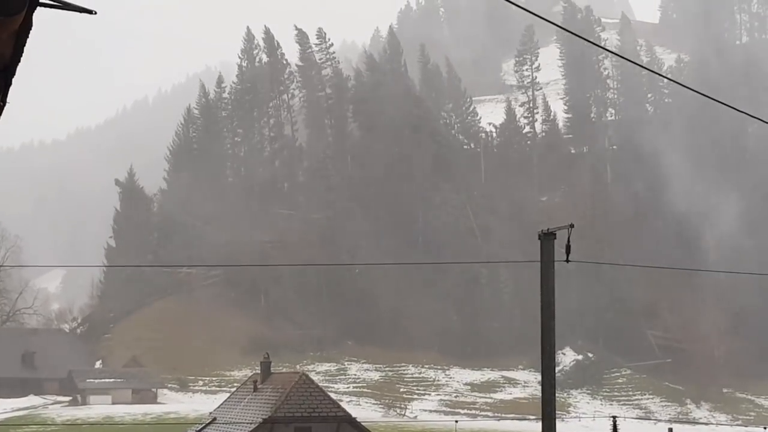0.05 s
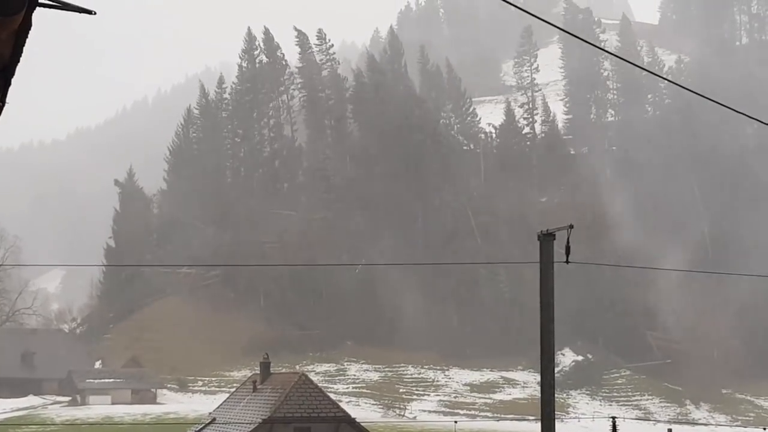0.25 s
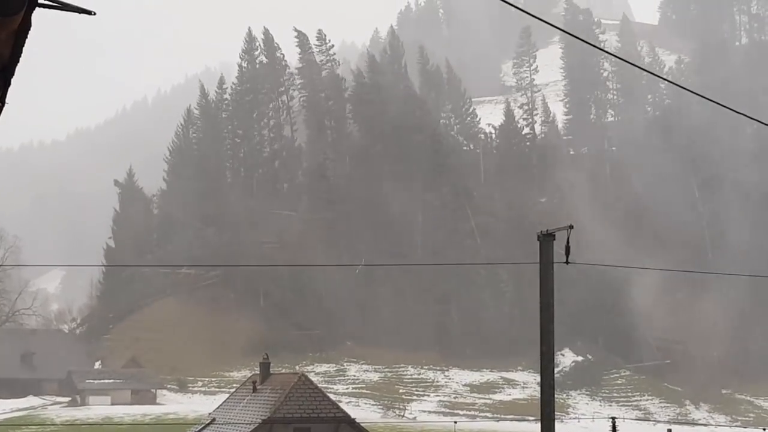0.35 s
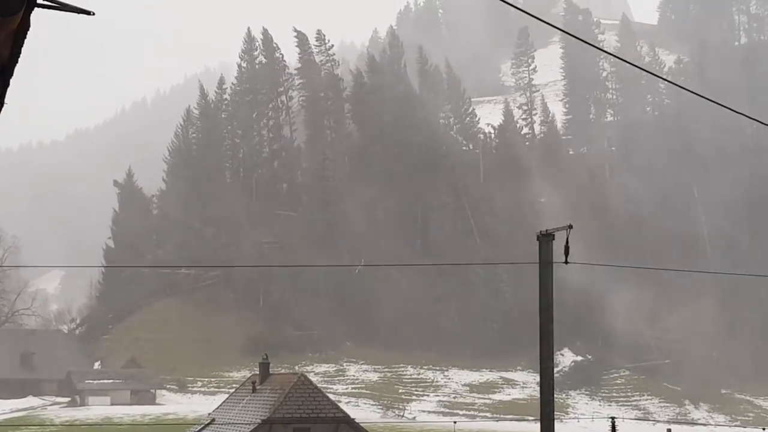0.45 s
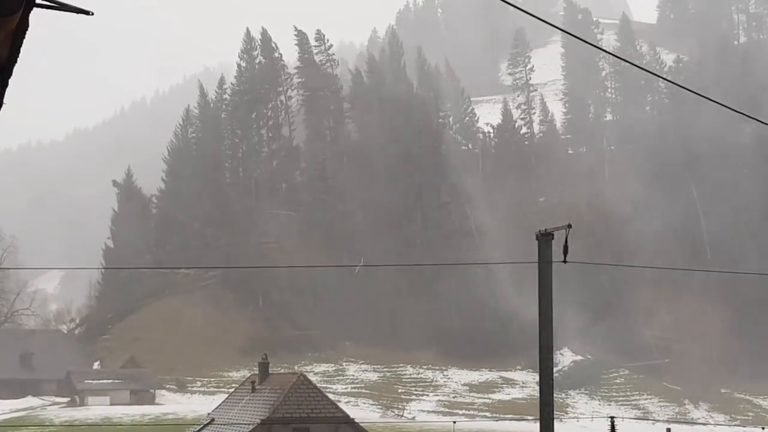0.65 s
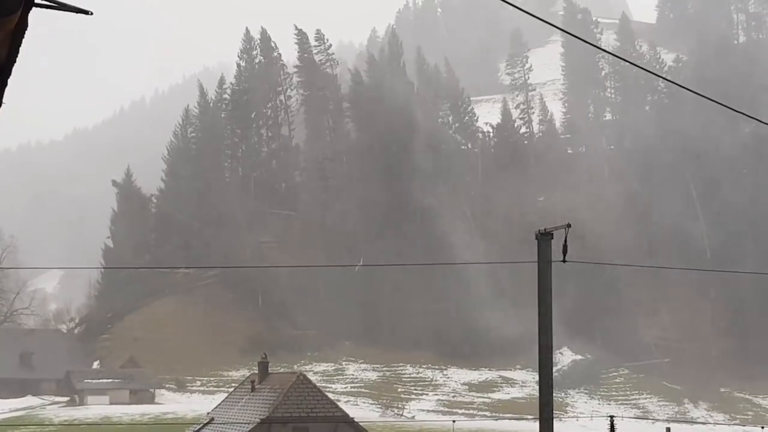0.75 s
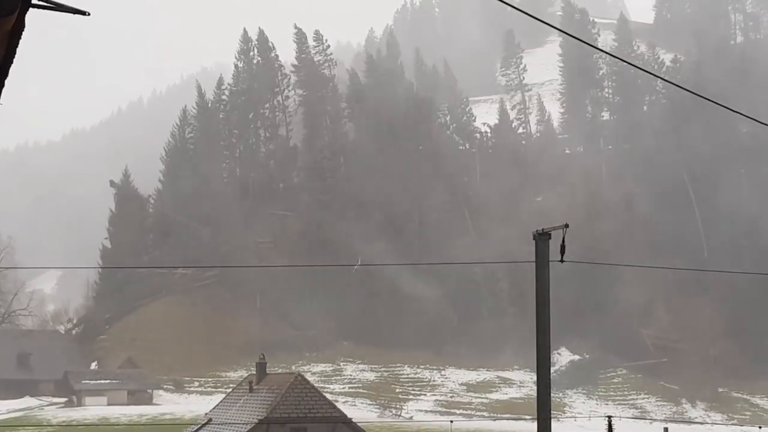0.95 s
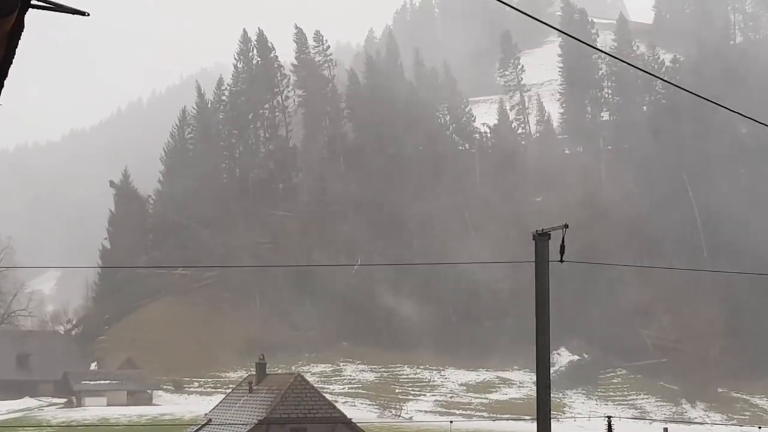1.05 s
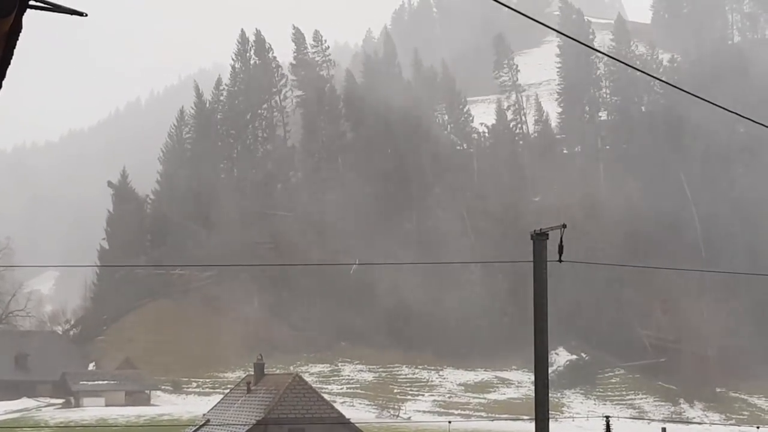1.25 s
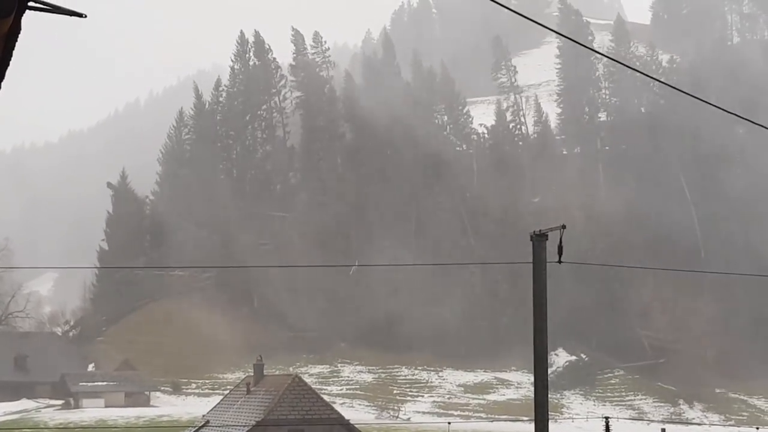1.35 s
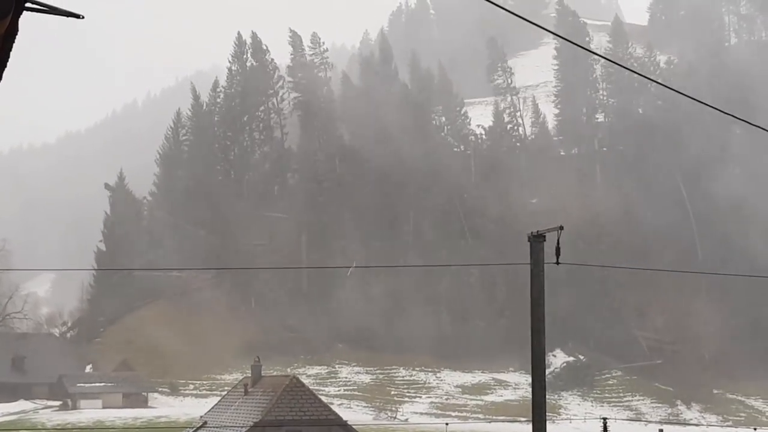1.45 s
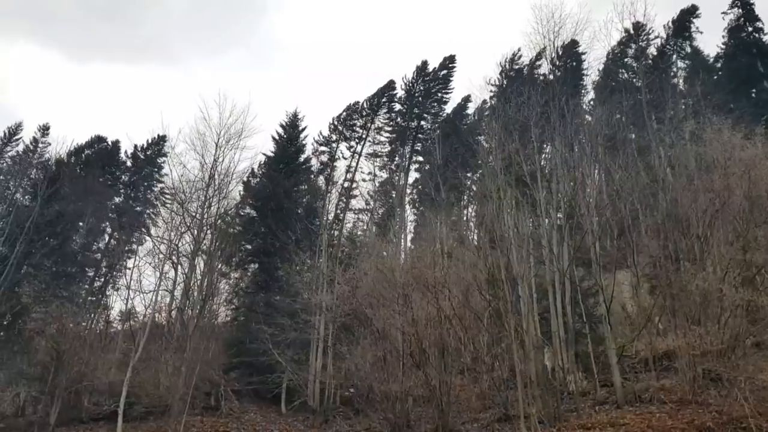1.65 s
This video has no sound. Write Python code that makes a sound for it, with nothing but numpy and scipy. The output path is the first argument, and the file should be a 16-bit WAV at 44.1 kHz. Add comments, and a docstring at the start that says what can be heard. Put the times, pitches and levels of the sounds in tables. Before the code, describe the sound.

Strong wind hits the microphone outdoors with uneven rumbling and thumps, building to a harsh, fluttering gust before easing. Underneath are a steady rush of wind in far trees and a few faint ticks of fine drops.

```python
"""Storm wind buffeting the left microphone port, on a wooded hillside. Eddies pass as suction pulses,
finer and harsher at the height of the gust, and a few catch the right port too. The strongest gusts
throb and rip. Fine spray ticks close to the microphone while the forest roars in the distance.
The wind drops, then a brighter rush sets in abruptly."""
import sys
import numpy as np
from scipy import signal
from scipy.io import wavfile
from scipy.ndimage import uniform_filter1d

SR = 44100
rng = np.random.default_rng(int(sys.argv[2]) if len(sys.argv) > 2 else 0)


def transcribe(u):
    """Save the signal u as a 16-bit wav file named by the first command-line argument.

    u: samples, shape (n,) or (channels, n), limited to [-1, 1]; the rate is SR.
    q: integer samples, one column per channel.
    """
    v = np.clip(np.atleast_2d(u).T, -1, 1)
    q = np.round(v * 32767).astype(np.int16)
    wavfile.write(sys.argv[1], SR, q)


N = 74970
TIME_S = np.arange(N) / SR


def from_db(db):
    """Decibels to gain."""
    return 10 ** (np.asarray(db) / 20)


def rms_one(x):
    """Scale to rms 1."""
    return x / np.sqrt(np.mean(x ** 2) + 1e-20)


def level_curve(rows):
    """Gain over time from rows of time_s, level_db."""
    time_s, level_db = np.transpose(rows)
    return from_db(np.interp(TIME_S, time_s, level_db))


def gate(start_s, length_s, edge_s=0.0044):
    """Fade in, hold, fade out."""
    return np.clip(np.minimum(TIME_S - start_s, start_s + length_s - TIME_S) / edge_s + .5, 0, 1)


def bursts(rows):
    """Gain over time from rows of start_s, length_s, level_db."""
    return sum(from_db(level_db) * gate(start_s, length_s) for start_s, length_s, level_db in rows)


def at_hz(rows, hz):
    """Read a table on a log-frequency axis."""
    freq_hz, value = np.transpose(rows)
    return np.interp(np.log(hz), np.log(freq_hz), value)


def butter(x, hz, kind):
    """Causal Butterworth filter."""
    sos = signal.butter(2, np.clip(hz, 10, .45 * SR), kind, fs=SR, output="sos")
    return signal.sosfilt(sos, x + 1e-18)


def drift(rate_hz):
    """Slow random wander of spread 1."""
    hop, settle = 40, 2000
    pole = np.exp(-2 * np.pi * rate_hz * hop / SR)
    white = rng.standard_normal(N // hop + settle + 2)
    slow = signal.lfilter([1], [1, -2 * pole, pole * pole], white)[settle:]
    return np.interp(np.arange(N) / hop, np.arange(len(slow)), rms_one(slow))


def airy_noise(spectrum, correlation, flicker_db, flicker_hz):
    """Third-octave bands of stereo noise, each with its own level, flicker and width; rms 1."""
    edges_hz = 25 * 2 ** (np.arange(29) / 3)
    shared_flicker = drift(flicker_hz)
    white = rng.standard_normal((2, 2, N))
    out = 0
    for k, (low, high) in enumerate(zip(edges_hz, edges_hz[1:])):
        mid, side = butter(white[k % 2], [low, high], "band")
        centre_hz = np.sqrt(low * high)
        alike = at_hz(correlation, centre_hz)
        flicker = .5 * shared_flicker + drift(flicker_hz)
        gain = from_db(at_hz(spectrum, centre_hz) + flicker_db * flicker)
        out += gain * (np.sqrt(1 + alike) * mid + np.sqrt(1 - alike) * side * [[1], [-1]])
    return rms_one(out)


def suction(time_s, width_s):
    """The bell-shaped pressure dip of one eddy: (samples it covers, pressure)."""
    span_s = np.array([time_s - 20 * width_s, time_s + 20 * width_s])
    first, last = np.clip(span_s * SR, 0, N).astype(int)
    offset = (TIME_S[first:last] - time_s) / width_s
    taper = np.cos(np.pi * offset / 40) ** 2
    return slice(first, last), -taper / (1 + offset ** 2)


def lone_eddies(rows, band_hz):
    """One band-limited dip for each row of time_s, depth_db, half_width_s."""
    pressure = np.zeros(N)
    for time_s, depth_db, width_s in rows:
        near, dip = suction(time_s, width_s)
        pressure[near] += from_db(depth_db) * dip
    return butter(butter(pressure, band_hz[0], "high"), band_hz[1], "low")


def eddies(speed, per_s, width_s, width_spread, spread_db, band_hz, even_s, regularity=4):
    """Suction pulses of varied width and depth, carried past at a relative speed; evened to rms 1."""
    count = 1500
    pressure, speed = np.zeros(N), speed * np.ones(N)
    gaps = rng.gamma(regularity, 1 / regularity, count)
    arrivals = np.searchsorted(np.cumsum(speed) * per_s / SR, np.cumsum(gaps))
    for i, (wide, deep) in zip(arrivals, rng.standard_normal((count, 2))):
        if i < N:
            near, dip = suction(i / SR, width_s * np.exp(width_spread * wide) / speed[i])
            pressure[near] += from_db(spread_db * deep) * dip
    pressure = butter(butter(pressure - pressure.mean(), band_hz[0], "high"), band_hz[1], "low")
    window = int(even_s * SR) + 1
    power = uniform_filter1d(uniform_filter1d(pressure ** 2, window), window)
    return pressure / np.sqrt(np.abs(power) + 1e-9)


# Roar of the distant trees: time_s, relative_level_db
ROAR_LEVELS = [(0.03, -42.5), (0.56, -42), (0.786, -45.5), (0.846, -45.5), (1.05, -49), (1.202, -48.5),
               (1.228, -49.5), (1.558, -50.5), (1.59, -50.5)]
# Its tone at the microphone: freq_hz, relative_density_db
ROAR_SPECTRUM = [(30, 1.5), (90, -1.5), (250, 0.5), (420, -3.5), (650, -5), (1200, -9), (2200, -10),
                 (3900, -20.5), (6000, -34.5), (9000, -39.5), (13000, -41), (15500, -44)]
# Its stereo image: freq_hz, left_right_correlation
ROAR_CORRELATION = [(100, 1), (600, 0.77), (1250, 0.15), (2200, 0.55), (3500, 0.37), (7000, 0.4),
                    (13000, 0.38)]


def forest():
    """Wind in far conifers: a smooth roar, a little right of centre, slowly easing."""
    gain_db, pan_db = 12.5, 0.83
    roar = airy_noise(ROAR_SPECTRUM, ROAR_CORRELATION, flicker_db=0.41, flicker_hz=6)
    return from_db(gain_db) * level_curve(ROAR_LEVELS) * roar * from_db([[-pan_db], [pan_db]])


# Tone of the closing rush of air: freq_hz, relative_density_db
RUSH_SPECTRUM = [(40, -11), (110, -1.5), (230, 4.5), (450, -2.5), (900, -6.5), (2100, -4.5), (3200, -9.5),
                 (5700, -14), (8000, -29), (12500, -34.5), (15000, -44)]
# Its stereo image: freq_hz, left_right_correlation
RUSH_CORRELATION = [(300, 0.96), (700, 0.61), (1200, -0.22), (2000, 0.47), (3500, -0.063), (10000, 0.1)]


def rush():
    """A brighter, wider rush of air that starts at once and holds."""
    start_s, attack_s, level_db = 1.607, 0.0076, -28
    onset = np.clip((TIME_S - start_s) / attack_s, 0, 1)
    air = airy_noise(RUSH_SPECTRUM, RUSH_CORRELATION, flicker_db=0.64, flicker_hz=10.4)
    return from_db(level_db) * onset * air


# Flurries of spray close to the microphone: start_s, length_s, level_db
SPRAY_FLURRIES = [(0.085, 0.047, -62), (0.32, 0.11, -61), (0.458, 0.02, -57), (0.635, 0.048, -62),
                  (0.937, 0.03, -64), (1.03, 0.017, -65), (1.162, 0.033, -66.5)]


def spray():
    """Tiny drops tick at random on both sides, louder in each flurry."""
    drops_per_s, floor_db, crossfeed = 730, -75, 0.33
    sizes = from_db(2.7 * np.minimum(rng.exponential(1, (2, N)), 4))
    signs = rng.choice([-1, 1], (2, N))
    impacts = sizes * signs * (rng.random((2, N)) < drops_per_s / SR)
    ticks = rms_one(butter(impacts + crossfeed * impacts[::-1], [8500, 15000], "band"))
    return (from_db(floor_db) + bursts(SPRAY_FLURRIES)) * ticks


# Larger drops landing nearby: start_s, relative_peak_db, left_minus_right_db
NEAR_DROPS = [(0.327, -41, -2), (0.334, -46, 0), (0.375, -49, -2), (0.462, -49, -6), (0.469, -48, 2),
              (0.638, -40, -3), (0.941, -42, -7)]


def splashes():
    """Each larger drop bursts into a short, high fizz."""
    decay_s = 0.0019
    envelope = np.zeros((2, N))
    for start_s, peak_db, pan_db in NEAR_DROPS:
        decay = (TIME_S >= start_s) * np.exp(-np.abs(TIME_S - start_s) / decay_s)
        envelope += from_db([[peak_db + pan_db / 2], [peak_db - pan_db / 2]]) * decay
    return envelope * butter(rng.standard_normal((2, N)), [10500, 15000], "band")


# Mist around the microphone: time_s, relative_level_db
MIST_LEVELS = [(0.03, -65), (0.512, -59.5), (0.886, -64.5), (0.994, -65), (1.358, -69), (1.59, -71)]


def mist():
    """The finest spray merges into a continuous hiss."""
    gain_db, correlation = -3.5, 0.54
    centre = np.sqrt(correlation) * rng.standard_normal(N)
    sides = np.sqrt(1 - correlation) * rng.standard_normal((2, N))
    hiss = rms_one(butter(centre + sides, [8500, 14300], "band"))
    return from_db(gain_db) * level_curve(MIST_LEVELS) * hiss


# Puffs on the right port: start_s, length_s, level_db
PUFFS = [(0.642, 0.059, -23.5), (0.735, 0.034, -29), (0.845, 0.0082, -17), (0.962, 0.023, -29),
         (1.258, 0.0325, -22), (1.34, 0.11, -34)]


def puffs():
    """Brief runs of eddies catch the right port."""
    return bursts(PUFFS) * eddies(speed=0.99, per_s=160, width_s=0.00089, width_spread=0.3,
                                  spread_db=1, band_hz=(68, 600), even_s=0.016)


# Spells of tearing at the left port: start_s, length_s, level_db
TEAR_SPELLS = [(0.7, 0.092, -30.5), (1.097, 0.131, -25)]


def tearing():
    """The flow tears at the port: a dense rasp of tiny eddies."""
    return bursts(TEAR_SPELLS) * eddies(speed=1, per_s=520, width_s=0.00034, width_spread=0.22,
                                        spread_db=5, band_hz=(650, 1600), even_s=0.02)


# Sharp rips within the tearing: time_s, relative_depth_db
RIP_DIPS = [(1.0999, -4), (1.1091, -7.5), (1.125, -12), (1.136, -9), (1.147, -0.5), (1.1588, -1),
            (1.194, -3.5), (1.197, -4), (1.2127, -6.5), (1.22, -3.5)]


def rips():
    """The flow breaks away from the port's edge: very narrow dips that crackle."""
    width_s = 0.00018
    return lone_eddies([(time_s, db, width_s) for time_s, db in RIP_DIPS], band_hz=(440, 1860))


# Slaps on the left port: time_s, relative_depth_db, half_width_s
SLAP_DIPS = [(0.23, -16, 0.002), (0.29, -20, 0.0011), (0.306, -12, 0.002), (0.446, -11, 0.0016),
             (0.573, 3.5, 0.00091), (0.707, -1.5, 0.00046), (0.775, -2, 0.00031), (0.9, 2.5, 0.00035),
             (0.945, -3, 0.0011), (0.982, -2.5, 0.00047), (1.084, -4, 0.00064), (1.103, -1.5, 0.00033),
             (1.233, -2, 0.00045), (1.251, -10, 0.00052), (1.335, 0, 0.00061), (1.341, -5, 0.0017)]


def slaps():
    """Lone hard eddies, each one deep dip."""
    return lone_eddies(SLAP_DIPS, band_hz=(111, 1540))


# Spells of throbbing at the left port: start_s, length_s, level_db
THROB_SPELLS = [(0.44, 0.058, -21.5), (0.705, 0.037, -19), (0.737, 0.052, -12.5), (0.895, 0.042, -10),
                (1.396, 0.042, -21)]


def throbbing():
    """Eddies are shed almost evenly, so the buffeting throbs."""
    return bursts(THROB_SPELLS) * eddies(speed=1, per_s=170, width_s=0.0015, width_spread=0.11,
                                         spread_db=1, band_hz=(133, 258), even_s=0.018, regularity=15.2)


# Pressure of the small eddies on the left port: time_s, relative_level_db
FLUTTER_LEVELS = [(0.52, -67), (0.572, -21), (0.594, -49), (0.616, -34.5), (0.652, -30), (0.676, -52),
                  (0.698, -27), (0.776, -19), (0.794, -42), (0.81, -19.5), (0.83, -24), (0.846, -21),
                  (0.88, -37.5), (0.912, -24.5), (0.936, -27), (0.984, -20), (1.015, -26.5), (1.05, -37.5),
                  (1.11, -24), (1.2, -25), (1.248, -33.5), (1.29, -50)]


def flutter():
    """Small, quick eddies flutter while the gust is strong."""
    gain_db = 7.5
    envelope = level_curve(FLUTTER_LEVELS) * gate(start_s=0.46, length_s=0.76, edge_s=0.016)
    pulses = eddies(speed=0.99, per_s=300, width_s=0.00055, width_spread=0.21,
                    spread_db=2.5, band_hz=(214, 830), even_s=0.024)
    return from_db(gain_db) * envelope * pulses


# Pressure of the large eddies on the left port: time_s, relative_level_db
GUST_LEVELS = [(0.0, -38), (0.04, -40), (0.062, -28), (0.09, -39), (0.15, -35), (0.235, -25), (0.295, -21),
               (0.358, -23), (0.402, -41.5), (0.44, -25), (0.482, -23.5), (0.516, -39.5), (0.558, -17),
               (0.576, -16.5), (0.606, -29), (0.662, -20), (0.68, -38.5), (0.704, -15.5), (0.762, -16.5),
               (0.8, -21.5), (0.89, -18), (0.94, -13), (0.956, -17), (0.994, -15), (1.022, -18.5),
               (1.115, -14.5), (1.15, -21), (1.188, -16.5), (1.27, -27), (1.292, -32.5), (1.308, -25),
               (1.335, -27), (1.368, -33), (1.406, -23), (1.436, -26.5), (1.458, -50.5), (1.482, -33.5),
               (1.6, -45.5), (1.628, -38.5), (1.7, -45)]


def rumble():
    """Large eddies rumble; stronger air moves faster, so they are shorter and come more often."""
    gain_db, full_gust_db = 6, -15
    gust = level_curve(GUST_LEVELS)
    speed = (gust / from_db(full_gust_db)) ** 0.24
    pulses = eddies(speed, per_s=175, width_s=0.001, width_spread=0.19,
                    spread_db=4.5, band_hz=(71.7, 476), even_s=0.024)
    return from_db(gain_db) * gust * pulses


def buffeting():
    """Wind right on the microphone: the left port takes the gust, the right a leak and its own puffs."""
    leak_db, port_low_hz = -14, 41
    left = rumble() + flutter() + tearing() + throbbing() + rips() + slaps()
    right = from_db(leak_db) * left + puffs()
    return butter(np.array([left, right]), port_low_hz, "high")


def scene():
    """Buffeting on the microphone and spray nearby, over the far roar and the closing rush."""
    return forest() + rush() + spray() + splashes() + mist() + buffeting()


def record(dry):
    """The strongest peaks are rounded and the top treble is cut."""
    cutoff_hz = 15500
    rounded = dry / (1 + dry ** 8) ** (1 / 8)
    return signal.sosfilt(signal.ellip(10, .2, 80, cutoff_hz, fs=SR, output="sos"), rounded)


dry = scene()
out = record(dry)
transcribe(out)
```